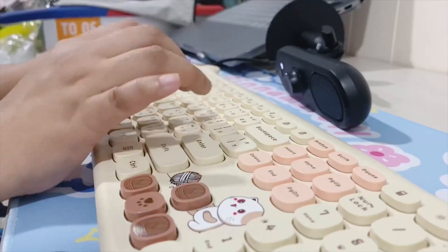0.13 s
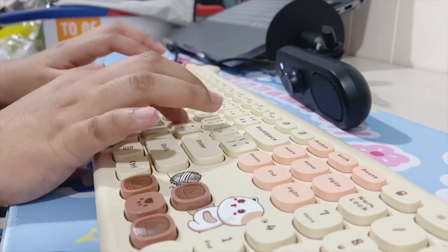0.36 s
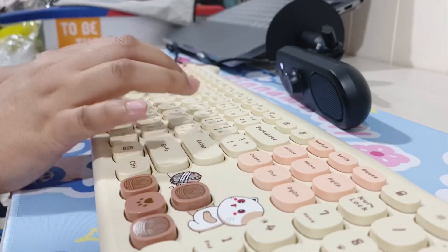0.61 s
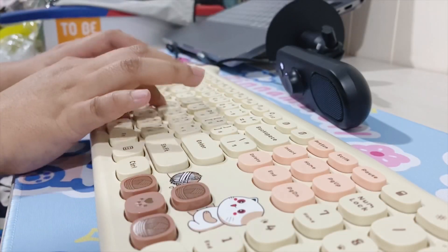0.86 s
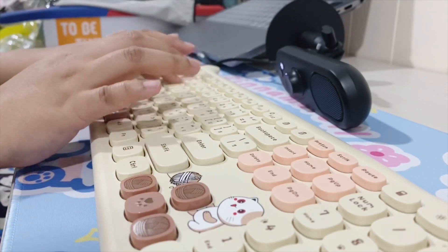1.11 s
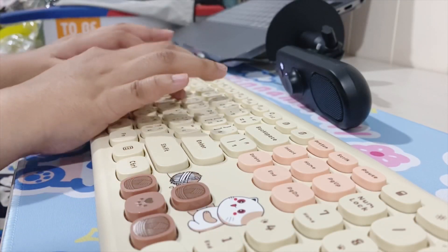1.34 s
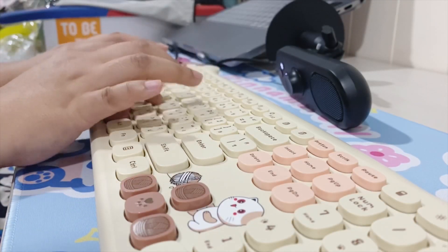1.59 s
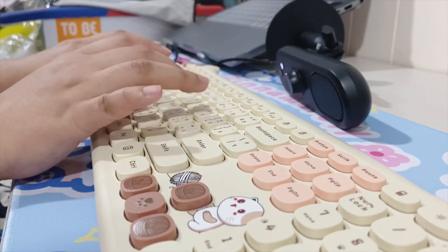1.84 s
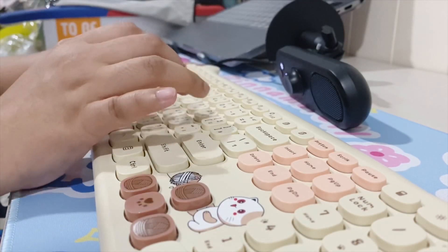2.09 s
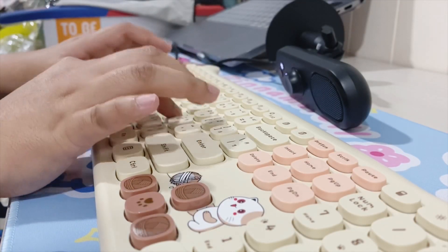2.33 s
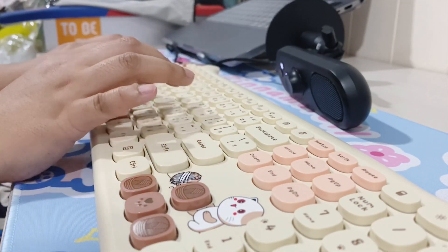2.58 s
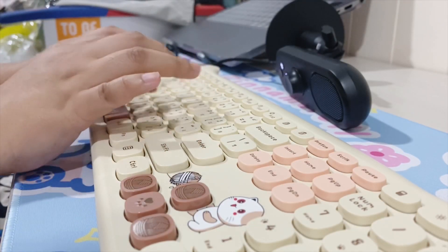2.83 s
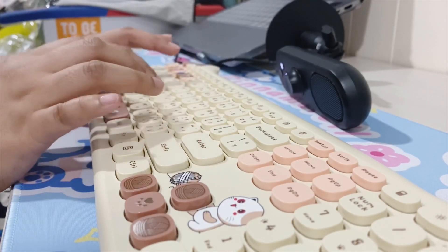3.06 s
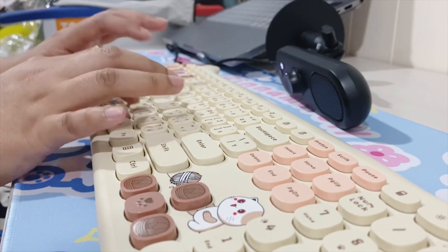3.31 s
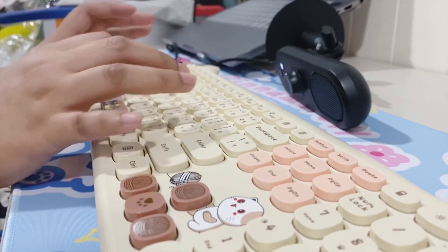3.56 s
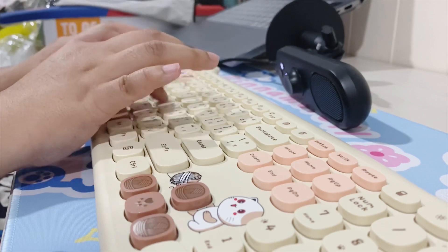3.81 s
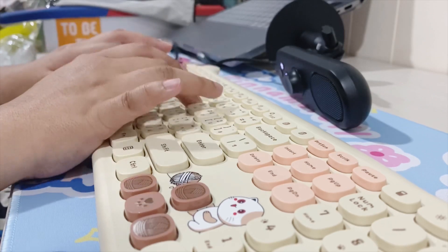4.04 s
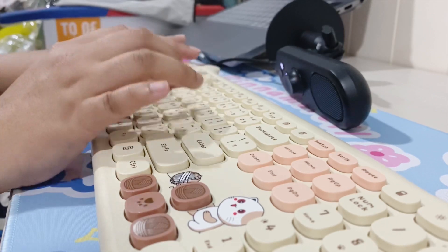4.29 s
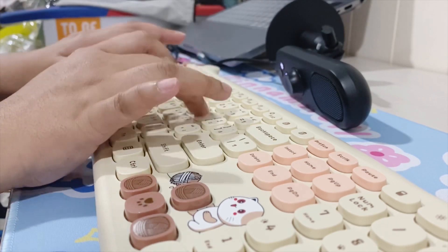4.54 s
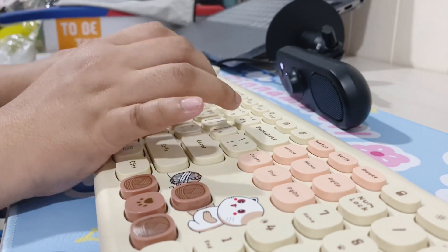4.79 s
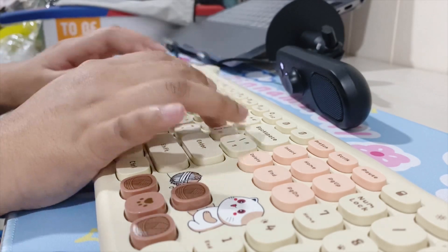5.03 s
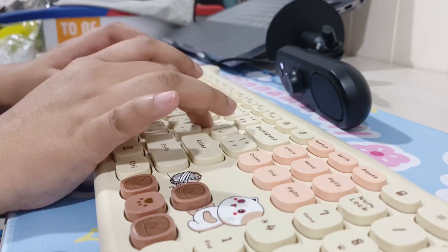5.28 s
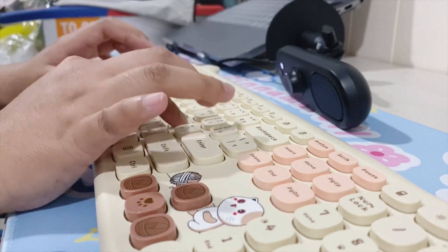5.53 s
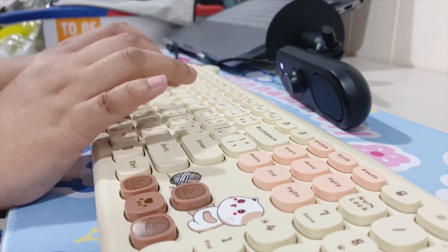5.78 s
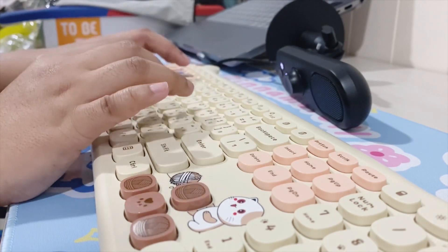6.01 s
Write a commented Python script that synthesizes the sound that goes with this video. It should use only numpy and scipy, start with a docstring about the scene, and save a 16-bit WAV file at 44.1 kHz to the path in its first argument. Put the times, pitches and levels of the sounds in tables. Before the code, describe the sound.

A near stereo microphone on a desk picks up quick soft-dome key presses, about ten a second, uneven in force. Clacks are woody and plastic, with crisp ticks and small rattles. Low rumble and very faint hiss lie beneath. After a cluster of harder blows with heavy desk thuds, the rumble drops abruptly and then slowly creeps partly back under continuing lighter taps.

```python
"""Fast typing on a light plastic keyboard, a hand's width from a phone with two microphone ports on the same desk.
A low rumble and faint hiss, both filtered noise, lie under everything from the start.
Each key lands with a few quick contacts that ring modes of cap and case; desk thumps, decaying sines, go with most.
A small room answers the keys with fading noise; here and there loose parts rattle.
The hardest stroke falls at 3.5 s; just before 4 s the rumble sinks, then partly returns as typing goes on."""
import sys
import numpy as np
from scipy import signal
from scipy.fft import rfft, irfft
from scipy.io import wavfile

SR = 44100
rng = np.random.default_rng(int(sys.argv[2]) if len(sys.argv) > 2 else 0)


def gain_from_db(level_db):
    """Convert decibel levels to linear amplitude factors (20 dB per decade)."""
    decades = np.asarray(level_db, float) / 20
    return 10 ** decades


def wrap_up_sound(samples):
    """Save the sound to the file named by the first command line argument, as 16-bit audio."""
    columns = np.atleast_2d(samples).T
    # keep every value between -1 and 1, then stretch to whole-number steps
    tamed = np.clip(columns, -1, 1)
    steps = np.round(tamed * 32767).astype(np.int16)
    wavfile.write(sys.argv[1], SR, steps)


N = 270774

# Level of the low rumble, before its wander: time_s, level_db
RUMBLE_LEVEL = [(0, -45.5), (2.4, -45), (2.8, -44), (3.85, -45), (4.0, -60.5), (6.14, -54)]
# Spectral density of the rumble, relative: frequency_hz, density_db_per_hz
RUMBLE_SPECTRUM = [(12, -54), (20, -42), (54, 3.5), (81, 5), (101, -0.5), (161, -11), (211, -13.5),
                   (259, -28), (300, -38), (390, -42), (660, -120)]
# Spectral density of the hiss, relative: frequency_hz, density_db_per_hz
HISS_SPECTRUM = [(120, -29.5), (200, 5), (275, -2), (570, -8), (1280, -15), (2450, -23.5), (4330, -21.5),
                 (8800, -28.5), (11500, -31), (16000, -27.5)]
# Blows taken by the desk; each sound begins 4 ms before its time: time_s, peak_db, pitch_hz
DESK_THUMPS = [(0.063, -42.5, 198), (.11, -49, 208), (.237, -49, 200), (0.375, -49.5, 164),
               (0.509, -43, 213), (.627, -54, 207), (.808, -50, 153), (.855, -42.5, 177),
               (.888, -39, 195.6), (0.997, -49.5, 157), (1.095, -48, 193), (1.193, -45, 141),
               (1.316, -37.5, 181), (1.398, -36, 207), (1.549, -35.5, 200), (1.657, -41, 198),
               (1.75, -38.5, 202.5), (1.893, -44, 199), (2.122, -46, 200), (2.152, -46.5, 201.7),
               (2.263, -44, 208), (2.368, -45.5, 182), (2.559, -39, 207), (2.735, -34.5, 201),
               (2.805, -35, 199), (2.985, -37.5, 172), (3.08, -42, 202), (3.215, -40, 183.5),
               (3.323, -37.5, 204), (3.419, -23, 170.7), (3.49, -21, 202.3), (3.524, -23, 170.7),
               (3.739, -48, 202), (3.782, -43, 145), (4.296, -48.5, 191.4), (4.579, -61.5, 211.5),
               (4.915, -53.5, 200), (5.024, -54, 202), (5.298, -50.5, 207), (5.386, -50.5, 204),
               (5.489, -55, 225), (5.612, -53, 210), (5.828, -58.5, 188), (5.973, -48, 192)]
# Reverberation of the room by bands: centre_hz, t60_s, relative_level_db
ROOM_BANDS = [(275, 0.23, 4.5), (402, 0.18, -3.5), (775, 0.2, -4.5), (1550, 0.22, -20), (2360, 0.26, -13.5),
              (4010, 0.25, -10.5), (5800, 0.32, -10.5), (10300, 0.27, -9.5)]
# Modes of case and keys, relative within each part: frequency_hz, weight_db
CASE_MODES = [(310, -10), (380, -5), (450, -6), (520, 2.5), (575, 9.5), (650, -7)]
KNOCK_MODES = [(800, -4), (915, 13.5), (1040, 10), (1210, 14), (1370, 23.5), (1600, 5), (1800, -7)]
CLICK_MODES = [(1650, 6.5), (1950, 10), (2230, 8.5), (2550, 3), (2900, -0.5), (3300, 3), (3700, -1.5),
               (4200, 1.5)]
RATTLE_MODES = [(4700, 8), (5300, -25), (5900, 15), (6400, 14.5), (7000, 11), (7500, 5.5), (8100, 6.5),
                (8800, -22.5), (9600, -14.5), (10500, -9.5), (11500, -22.5), (12500, -5.5), (14500, -13.5)]
# Phase between the ports: frequency_hz, left_lead_rad
PORT_PHASE_LEAD = [(0, 0.71), (690, 1.67), (950, 1.15), (1550, 2.37), (2070, 1.8), (2760, 0.69),
                   (3190, 1.7), (3620, 5.26), (4390, 8.8), (5170, 5.5), (5600, 3.7), (6460, 2.9),
                   (7240, 9.6), (8530, 7.7)]
# Level between the ports: frequency_hz, left_minus_right_db
PORT_LEVEL_DIFFERENCE = [(300, -2), (900, -.5), (3000, -0.5), (5500, 6), (8200, -13.5), (11000, -1.5)]
# Treble response of the microphone: frequency_hz, gain_db
MICROPHONE_RESPONSE = [(8600, -1), (9600, -5.5), (11000, -5), (13000, -19.5), (16000, -35)]
# Loose caps and wires of wide keys that rattle on, levels before the gains of path:
# landing_s, level_db, pitch_hz
LOOSE_PARTS = [(0.848, -45, 5440), (1.538, -43, 6360), (1.5444, -44, 5240), (1.909, -50, 4670),
               (2.255, -53.5, 4800), (2.5496, -38, 6300), (2.5574, -37.5, 6240), (3.4084, -29.5, 6030),
               (3.5084, -26.5, 8260), (3.733, -37, 5000), (4.2777, -60, 6350), (4.4732, -53, 5730),
               (5.011, -62.5, 6700), (5.479, -44.5, 6400), (5.4874, -48.5, 6950), (5.8212, -41.5, 4640)]
# Key strokes, case and click levels against the knock:
# landing_s, knock_level_db, knock_pitch_hz, case_level_db, click_level_db
KEY_STROKES = [(0.061, -18, 1380, -9.5, -9), (.232, -25, 1020, -7.5, -5), (.339, -56.5, 708, 4, 0.5),
               (0.371, -45, 1090, -10, -0.5), (0.496, -26, 993, -19, -6.5), (.616, -56, 703, 10.5, 5.5),
               (.644, -47.5, 1120, 2, -2), (0.793, -41.5, 904, 5.5, -5.5), (0.85, -29.5, 921, 0, 2),
               (0.88, -35, 1190, -25, 2.5), (.974, -28, 931, -11.5, -4.5), (1.057, -32, 1230, 0, -0.5),
               (1.086, -42.5, 1610, -24, -1.5), (1.189, -31.5, 1230, -0.5, -6.5),
               (1.281, -34, 1390, -11, -3.5), (1.304, -36.5, 1240, -9, -6), (1.362, -59, 1200, 14, 4.5),
               (1.39, -18, 1330, -7, -7), (1.539, -30.5, 1750, -5, 2.5), (1.547, -30.5, 900, 2.5, 4.5),
               (1.653, -25.5, 1230, -30, -5), (1.739, -35.5, 929, 4, 2.5), (1.882, -34, 958, 0, -3),
               (1.91, -30, 1090, -32, -2), (2.021, -23.5, 921, -10, -5), (2.112, -40, 964, -3.5, -2),
               (2.136, -41, 999, -13, -15.5), (2.246, -31, 969, -1, -10), (2.256, -37, 937, -0.5, 5),
               (2.365, -26, 1410, -18, -5.5), (2.549, -44, 700, -18.5, 4.5), (2.556, -32, 1170, 4.5, 6),
               (2.696, -38, 1380, -6, 0), (2.705, -27, 1190, -3.5, -3), (2.799, -22, 977, -20, -4.5),
               (2.97, -31.5, 813, -5, 2), (3.072, -27, 1240, -9.5, -7), (3.196, -30, 1380, -13, 0),
               (3.308, -56.5, 1210, -15, 6.5), (3.314, -22.5, 934, -14, -5),
               (3.407, -19.5, 926, -27.5, 5.5), (3.505, -7.5, 923, -39.5, -3.5),
               (3.737, -20.5, 1040, -11, 1), (3.833, -27.5, 966, -5, -3), (4.013, -44, 1330, -7, 4),
               (4.032, -52, 920, 0, 7.5), (4.123, -28.5, 1320, -11, -1), (4.281, -37.5, 1020, -2, 3),
               (4.386, -33, 1310, -6.5, -1.5), (4.473, -36, 1440, -10, 0), (4.576, -31.5, 1320, -18, -6),
               (4.751, -47.5, 807, 7.5, 6.5), (4.791, -49, 1240, -5.5, 5), (4.905, -31.5, 888, -13, -3.5),
               (5.013, -38.5, 1100, -2, 3), (5.115, -33, 982, -43, -4.5), (5.286, -44, 1330, -12, 5.5),
               (5.378, -25.5, 1110, -34, -3.5), (5.481, -35, 1430, -13, 0.5), (5.604, -29, 1040, -36, -5),
               (5.629, -34, 1450, -6.5, -1), (5.822, -27, 1340, -21, -1.5), (5.969, -22, 964, -42, -5.5),
               (6.016, -34.5, 869, -7, 2.5)]

TIME_S = np.arange(N) / SR
FREQUENCY_HZ = np.arange(N // 2 + 1) * SR / N
SIDES = np.array([[1], [-1]])  # left and right port
WAVER_DB, WAVER_POINTS_PER_S = 2, 6  # random wander of the rumble's level
HISS_DB = -71.5  # rms of the part of the hiss shared by both ports
THUMP_T60_S = 0.12
CASE_T60_S, KNOCK_T60_S, CLICK_T60_S, RATTLE_T60_S = 0.03, 0.017, 0.005, 0.0035
RING_SAMPLES, STROKE_SAMPLES, TAIL_SAMPLES = 2048, 4000, 16000
LANDING_SAMPLE = 800  # the landing within a train of contacts
PORT_LAG_S = 0.00004  # standard deviation, from key to key, of the lag between the ports
# A looser cap clicks louder, higher, and rattles far more.
CLICK_HZ, CLICK_OCTAVES_PER_DB, CLICK_SCATTER_OCTAVES = 2380, 0.07, 0.1  # pitch at a click level of 0 dB
RATTLE_DB, RATTLE_DB_PER_DB = -16, 1.7  # level against the knock at a click level of 0 dB, and its slope


def shape(x, points):
    """Linear filtering: each frequency is scaled by a gain interpolated over log frequency."""
    hz, db = np.transpose(points)
    gain = gain_from_db(np.interp(np.log(FREQUENCY_HZ + 1), np.log(hz), db))
    return irfft(rfft(x) * gain, N)


def coloured_noise(points):
    """Filtered white noise keeps random phase and takes the filter's spectrum; rms 1."""
    noise = shape(rng.standard_normal(N), points)
    return noise / np.sqrt(np.mean(noise ** 2))


def add(out, x, start_s):
    """Superposition: a short sound is summed in at its time."""
    i = max(int(start_s * SR), 0)
    out[:, i:i + x.shape[1]] += x[:, :N - i]


def rumble():
    """Spatial coherence: low noise is nearly alike at both ports but shifted in phase."""
    mid = coloured_noise(RUMBLE_SPECTRUM)
    quadrature = signal.hilbert(mid).imag
    side = gain_from_db(-10.5) * quadrature + gain_from_db(-17.0) * coloured_noise(RUMBLE_SPECTRUM)
    waver = np.interp(TIME_S * WAVER_POINTS_PER_S, np.arange(200), rng.standard_normal(200))
    level_db = np.interp(TIME_S, *np.transpose(RUMBLE_LEVEL)) + WAVER_DB * waver
    return gain_from_db(level_db) * (mid - SIDES * side)


def hiss():
    """Incoherence: nearly equal sum and difference noises make the hiss unalike at the two ports."""
    shared = coloured_noise(HISS_SPECTRUM)
    opposed = gain_from_db(-0.5) * SIDES * coloured_noise(HISS_SPECTRUM)
    return gain_from_db(HISS_DB) * (shared + opposed)


def room():
    """Diffuse reverberation: dense echoes fade band by band, with the bass more alike at both ports."""
    t = np.arange(TAIL_SAMPLES) / SR
    bands, fades = [], []
    for hz, t60, db in ROOM_BANDS:
        band_filter = signal.butter(2, [hz / 1.247, hz * 1.368], "band", fs=SR, output="sos")
        mid, side = signal.sosfilt(band_filter, rng.standard_normal((2, N + TAIL_SAMPLES)))
        bands.append(mid + SIDES * side * min(hz / 800, 1))
        fade = np.exp(-np.log(1000) * t / t60) * (1 - np.exp(-t / 0.0013))
        fades.append(gain_from_db(db) * fade / np.sqrt(np.sum(fade ** 2)))

    def echoes(start_s):
        """Impulse response: noise taken from the stroke's time gives each its own echo pattern."""
        i = int(start_s * SR)
        return sum(band[:, i:i + TAIL_SAMPLES] * fade for band, fade in zip(bands, fades))

    return echoes


def desk():
    """Damped resonance: a low board mode swells for a cycle and dies, out of phase between the ports."""
    out, t = np.zeros((2, N)), np.arange(SR // 4) / SR
    envelope = (1 - np.exp(-t / 0.0052)) * np.exp(-np.log(1000) * t / THUMP_T60_S)
    envelope = envelope / envelope.max()
    port_phase = SIDES * 0.5 * 1.28  # radians
    for (time_s, db, hz), turn in zip(DESK_THUMPS, rng.random(len(DESK_THUMPS))):
        thump = envelope * np.sin(2 * np.pi * (hz * t + turn) + port_phase)
        add(out, gain_from_db(db) * thump, time_s - 0.004)
    return out


def ports(x):
    """Diffraction: the phone's body shifts and shades the near sound differently at its two ports."""
    phase = np.interp(FREQUENCY_HZ, *np.transpose(PORT_PHASE_LEAD))
    db = np.interp(FREQUENCY_HZ, *np.transpose(PORT_LEVEL_DIFFERENCE))
    return irfft(rfft(x) * np.exp(0.5j * SIDES * phase) * gain_from_db(SIDES * db / 2), N)


def near_pitch(modes, hz, db_per_octave_squared):
    """Selective excitation: modes weaken with the square of their distance in octaves from a pitch."""
    return -db_per_octave_squared * np.log2(np.array(modes)[:, :1] / hz) ** 2


def ring(modes, t60, weight_db, chance, lag_s, scatter_db, detune, side_db):
    """Modal superposition: damped sines, weighted and tuned afresh for each stroke, reach both ports."""
    hz, db = (column[:, None] for column in np.transpose(modes))
    port_delay = np.maximum(lag_s * SIDES, 0)[:, None]
    t = np.maximum(np.arange(RING_SAMPLES) / SR - port_delay, 0)
    level_db = db + weight_db + scatter_db * chance[:, :1]
    size = gain_from_db(level_db + side_db * chance[:, 2:3] * SIDES[:, None])
    size = size * (-1.) ** np.arange(len(hz))[:, None]  # neighbouring modes swing in opposite sense
    tuned_hz = hz * (1 + detune * chance[:, 1:2])
    decay = np.exp(-np.log(1000) * t / t60)
    x = np.sum(size * decay * np.sin(2 * np.pi * tuned_hz * t), axis=1)
    # energy scaled with the decay time, for a peak near 1
    return x / np.sqrt(np.sum(x ** 2) * 10 / (t60 * SR))


def contacts(chance, spread_s, slide_s, slide_db, scatter_db, lead_db):
    """Repeated impact: the stem scrapes down its guide, lands and bounces, weaker away from the landing."""
    train = np.zeros(RING_SAMPLES)
    before = chance[:, 0] < 0
    offset_s = chance[:, 0] * np.where(before, slide_s, spread_s)
    at = np.clip(LANDING_SAMPLE + offset_s * SR, 0, RING_SAMPLES - 1).astype(int)
    level_db = scatter_db * chance[:, 1] + slide_db * before - 2.6 * np.abs(chance[:, 0])
    np.add.at(train, at, np.sign(chance[:, 2]) * gain_from_db(level_db))
    train[LANDING_SAMPLE] += gain_from_db(lead_db)
    return train[None] / np.sqrt(np.sum(train ** 2))


def loose_parts(echoes):
    """Secondary vibration: loose caps and wires rattle on in high modes under many tiny contacts."""
    near, far = np.zeros((2, N)), np.zeros((2, N))
    chances = rng.standard_normal((len(LOOSE_PARTS), 160, 3))
    for (landing_s, db, hz), c in zip(LOOSE_PARTS, chances):
        near_db = near_pitch(RATTLE_MODES, hz, 60)
        rattle = ring(RATTLE_MODES, RATTLE_T60_S, near_db, c[1:14], PORT_LAG_S * c[0, 0], 1.5, 0.02, 2.0)
        rattle = gain_from_db(db) * rattle
        shaking = contacts(c[14:], 0.0083, 0.0028, -7.0, 2.8, 15)
        direct = gain_from_db(7.5) * signal.fftconvolve(rattle, shaking, axes=1)
        add(near, direct, landing_s - LANDING_SAMPLE / SR)
        add(far, gain_from_db(11.5) * signal.fftconvolve(rattle[:1], echoes(landing_s), axes=1), landing_s)
    return ports(near) + far


def keys(echoes):
    """Impact excitation: one soft blow drives knock and case, many tiny ones shake click and rattle."""
    near, far = np.zeros((2, N)), np.zeros((2, N))
    push = np.hanning(int(0.00052 * SR))[None]  # the rubber dome stretches the blow
    t = np.arange(RING_SAMPLES) / SR
    swell = 1 - np.exp(-t / 0.0051)  # the hollow case takes a few cycles to speak
    chances = rng.standard_normal((len(KEY_STROKES), 300, 3))
    for (landing_s, db, hz, case_db, click_db), c in zip(KEY_STROKES, chances):
        lag_s = np.clip(PORT_LAG_S * c[0, 0], -0.001, 0.001)
        octaves = CLICK_OCTAVES_PER_DB * click_db + CLICK_SCATTER_OCTAVES * c[0, 1]
        click_hz = CLICK_HZ * 2 ** octaves
        rattle_db = RATTLE_DB + RATTLE_DB_PER_DB * click_db

        # the struck cap favours the modes near its own pitch
        knock_weight_db = near_pitch(KNOCK_MODES, hz, 40)
        click_weight_db = near_pitch(CLICK_MODES, click_hz, 8)
        knock = ring(KNOCK_MODES, KNOCK_T60_S, knock_weight_db, c[1:8], lag_s, 1.5, 0.025, 1)
        case = gain_from_db(case_db) * swell * ring(CASE_MODES, CASE_T60_S, 0, c[8:14], lag_s, 2, 0.03, 1)
        click = ring(CLICK_MODES, CLICK_T60_S, click_weight_db, c[14:22], lag_s, 1.5, 0.03, 1.5)
        click = gain_from_db(click_db) * click
        rattle = gain_from_db(rattle_db) * ring(RATTLE_MODES, RATTLE_T60_S, 0, c[22:35], lag_s, 1.5, 0.02, 2)

        blow = signal.fftconvolve(contacts(c[35:46], 0.003072, 0.00374, -16, 3.2, 6.66), push)
        blow = blow / np.sqrt(np.sum(blow ** 2) * push.sum())
        click_contacts = contacts(c[46:140], 0.008, 0.0045, -7.5, 5.4, 17)
        rattle_contacts = contacts(c[140:], 0.011, 0.0016, -5.0, 2.6, 22)
        stroke = signal.fftconvolve(knock + case, blow, axes=1)[:, :STROKE_SAMPLES]
        stroke += signal.fftconvolve(click, click_contacts, axes=1)[:, :STROKE_SAMPLES]
        stroke += signal.fftconvolve(rattle, rattle_contacts, axes=1)[:, :STROKE_SAMPLES]
        add(near, gain_from_db(db) * stroke, landing_s - LANDING_SAMPLE / SR)

        # the cap's knock beams upward and only its first swings reach the walls
        first_swings = knock * np.exp(-t / 0.0018)
        sent = gain_from_db(-0.5) * first_swings + gain_from_db(-4.0) * case + click + rattle
        reverberation = signal.fftconvolve(sent[:1], echoes(landing_s), axes=1)
        add(far, gain_from_db(db + 3.0) * reverberation, landing_s)
    return ports(near) + far


def scene():
    """Superposition: background, desk, loose parts and keys sum, the last two sharing one room."""
    echoes = room()
    return rumble() + hiss() + desk() + loose_parts(echoes) + keys(echoes)


def roll_off(x):
    """The treble ends steeply here."""
    return signal.sosfilt(signal.butter(12, 15500, fs=SR, output="sos"), x)


def record(dry):
    """Transducer response: the microphone falls off in the top treble."""
    mix = shape(dry, MICROPHONE_RESPONSE)
    return roll_off(mix)


dry = scene()
out = record(dry)
wrap_up_sound(out)
```